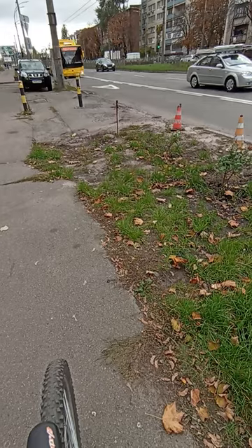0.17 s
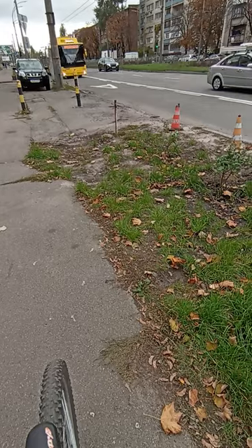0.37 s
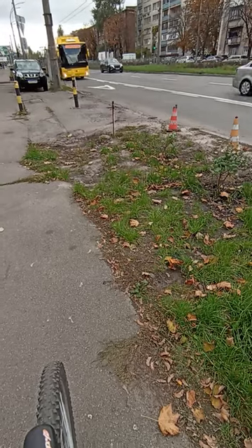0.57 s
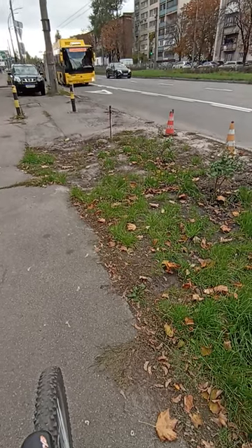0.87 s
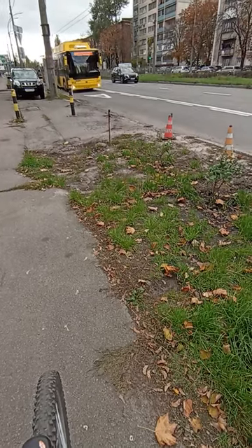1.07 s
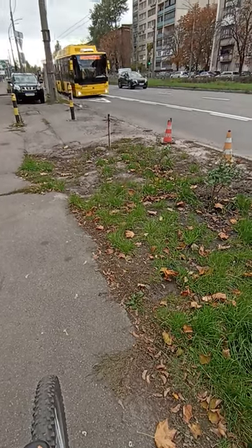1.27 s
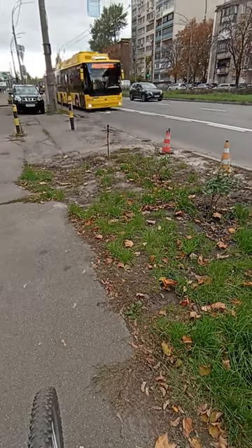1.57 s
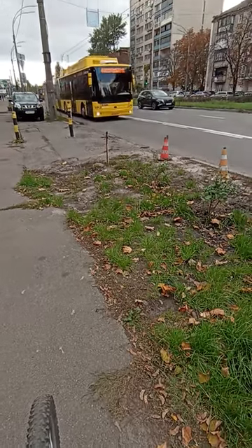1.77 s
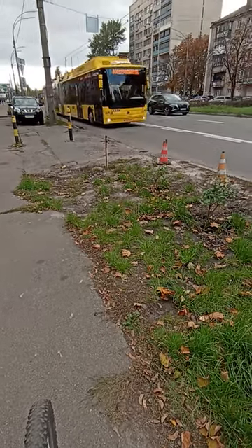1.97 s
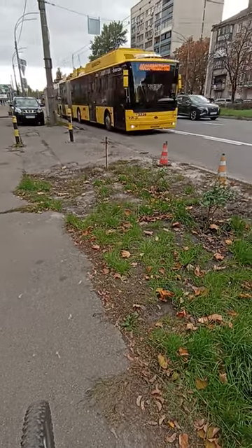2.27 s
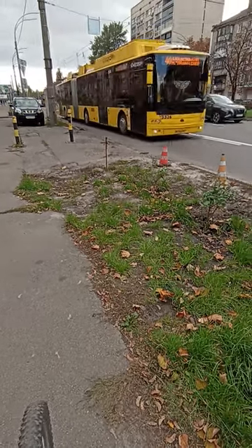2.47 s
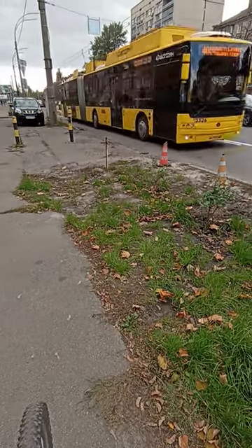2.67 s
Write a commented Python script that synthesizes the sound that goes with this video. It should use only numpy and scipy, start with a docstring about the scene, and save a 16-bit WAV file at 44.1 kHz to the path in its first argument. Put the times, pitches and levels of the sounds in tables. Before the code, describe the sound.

Outdoor roadside stereo pickup: car tyres hiss away first, then trolleybus tyres swell and stay loud, with bass rumble, short gliding electric whines, a few dull body knocks and faint dry ticks.

```python
"""Tyres roar on a city street: a car recedes as its level falls, then a trolleybus nears as its level rises.
The roar is coloured noise with random flutter, over a low noise rumble and a wavering traffic hum.
Gliding tones whine in short swells; noise bursts through resonances make body rattles and faint dry ticks.
Very high chirps are brief swells of tone. The whole street fades in and spreads over two microphone ports."""
import sys
import numpy as np
from scipy import signal
from scipy.fft import rfft, irfft, next_fast_len
from scipy.io import wavfile
from scipy.ndimage import uniform_filter1d, map_coordinates

SR = 44100
rng = np.random.default_rng(int(sys.argv[2]) if len(sys.argv) > 2 else 0)


def file_out(sig):
    """Save sig as 16-bit WAV at sys.argv[1]."""
    # one column per channel
    cols = np.atleast_2d(sig).T
    # limit, then scale
    lim = np.clip(cols, -1, 1)
    pcm = np.round(lim * 32767).astype(np.int16)
    wavfile.write(sys.argv[1], SR, pcm)


N = 123921

# Tyre roar over time, before the treble swells. Each row: time in seconds, level in dB.
CAR_LEVEL = [(.3, -32), (.8, -31), (1.1, -33), (1.5, -40), (2, -39.5), (2.8, -43)]
BUS_LEVEL = [(.3, -48), (1, -35.5), (1.4, -30.5), (1.8, -28), (2, -28.5), (2.3, -27.5), (2.55, -28),
             (2.8, -27)]
# Relative spectrum of the tyre roar. Each row: frequency in Hz, density in dB per Hz.
CAR_COLOUR = [(200, -24), (420, -3.5), (600, -4), (830, 1), (1000, -2.5), (1130, -7.5), (1450, -6.5),
              (2000, -12.5), (2700, -16), (3500, -23), (3850, -29.5), (4600, -32), (5300, -37.5),
              (6700, -34), (7200, -41.5), (8600, -46.5), (9500, -42), (11400, -41), (11900, -34),
              (13500, -41), (15500, -46)]
BUS_COLOUR = [(200, -22), (420, -2.5), (600, -2.5), (850, 1), (1000, -2.5), (1200, -6), (1700, -9),
              (2100, -13.5), (2900, -23), (3550, -25), (3850, -31.5), (4800, -35.5), (6700, -36.5),
              (7100, -50.5), (8700, -47), (9400, -46.5), (11400, -43), (11900, -39), (13500, -45.5),
              (15500, -52)]
# Treble of the tyre roar. Each row: time in seconds, change in dB well above the split.
TREBLE_LEVEL = [(.3, -0.5), (.7, 1.5), (.95, 1.2), (1.12, 1.5), (1.3, 0.5), (1.65, -1), (1.8, 1),
                (2.05, 1.2), (2.2, -1), (2.8, 2)]
TREBLE_SPLIT_HZ = 4500
# Low road rumble over time. Each row: time in seconds, level in dB before the trim.
RUMBLE_LEVEL = [(.1, -31.5), (.4, -30.5), (.6, -30.5), (.75, -29.5), (.92, -30.3), (1.04, -27.5),
                (1.15, -32), (1.3, -30), (1.6, -29.5), (1.84, -25.5), (2, -30), (2.15, -27), (2.45, -27.5),
                (2.8, -23.5)]
# Relative spectrum of the rumble. Each row: frequency in Hz, density in dB per Hz.
RUMBLE_COLOUR = [(20, -35), (40, -31), (52, -20), (65, -8.5), (100, -3.5), (150, -1.5), (230, 0), (330, -1),
                 (420, -2.5), (520, -14), (700, -28), (1500, -62)]
RUMBLE_TRIM_DB = -0.02
# Bass traffic hum. Each row: time in seconds, pitch in Hz, level in dB around which it wavers.
HUM = [(.2, 70.1, -51), (.45, 70.4, -44), (.6, 67.2, -41), (.95, 69.9, -38), (1.1, 70.4, -45.5),
       (1.3, 70.4, -37.5), (1.6, 73.25, -38.5), (1.8, 75.1, -31.5), (1.95, 75, -37.5), (2.1, 77.1, -43.5),
       (2.4, 75.34, -45), (2.8, 76.2, -47)]
# Overtones of the drone. Each row: multiple of the base pitch, level in dB before the swells.
DRONE_OVERTONES = [(2, -40), (3, -38.5)]
# Swells of the drone. Each row: time in seconds, change in level in dB.
DRONE_SWELL = [(.2, -5), (.7, 1.5), (1.2, -7), (1.7, -2), (2.2, -20)]
DRONE_BASE_HZ = 75
# High chirps. Each row: start in seconds, level in dB before the trim, pitch in Hz.
CHIRPS = [(0.1141, -49.5, 9700), (0.3092, -56, 9650), (0.4065, -56, 9500), (0.5931, -65, 9650),
          (0.718, -56, 9490), (0.8086, -57, 9650), (0.9193, -62, 9460), (1.0131, -56, 9460),
          (1.1169, -53, 9280), (1.2206, -64, 9430), (1.3251, -59, 9140), (1.4278, -59, 9330),
          (1.5354, -59, 9580), (1.6092, -61, 9320), (1.6347, -53.5, 9270), (1.8462, -54, 9160),
          (2.0667, -61, 9220), (2.1715, -60, 9350), (2.2827, -64, 8890), (2.393, -55, 9150)]
CHIRP_S, CHIRP_TRIM_DB, CHIRP_WANDER_HZ = 0.0045, -3.5, 330
# Swells of whine. Each row: centre in seconds, half length in seconds, pitch at the centre in Hz,
# glide in Hz per second, level in dB at the centre, pitch wander in Hz.
WHINES = [(1.664, 0.1, 200, -2.5, -37, 3.03), (2.16, 0.096, 200, -20.5, -32.5, 6),
          (2.12, 0.066, 300, -80, -30.5, 12), (2.29, 0.1, 300, -39.5, -31, 4),
          (2.3, 0.076, 303, -33, -32, 4), (2.62, 0.13, 245, -21.5, -35, 5.2),
          (2.55, 0.15, 143, 21.5, -35.5, 6), (2.25, 0.099, 960, -100, -38.5, 25),
          (2.44, 0.11, 850, -29.5, -35.5, 18), (2.75, 0.075, 872, 40.5, -36, 14),
          (1.6, .1, 3400, -200, -55.5, 130), (0.41, 0.13, 2500, -500, -47.5, 400),
          (2.02, 0.31, 1620, 0, -44, 330)]
# Small dry ticks. Each row: start in seconds, level in dB, centre of the resonance in Hz.
TICKS = [(.832, -51, 12100), (.875, -50.5, 6000), (.973, -53, 7500), (1.093, -48, 4180), (1.12, -53, 5500),
         (1.271, -51, 7800), (1.552, -53, 4600), (1.91, -57, 7890), (2.364, -51, 11400), (2.365, -49, 5200),
         (2.503, -53, 6000), (2.761, -45, 6190), (2.761, -51, 10000)]
TICK_T60_S, TICK_WIDTH = 0.028, 0.15  # decay of the push; resonance width as a share of its centre
# Body rattles. Each row: start in seconds, level in dB, centre of the resonance in Hz.
RATTLES = [(1.579, -32, 2370), (1.595, -30, 1493), (1.806, -21, 710), (1.817, -27, 1153),
           (1.818, -38.5, 3180), (1.818, -45, 5670), (2.06, -48, 4600), (2.714, -29, 684)]
RATTLE_T60_S, RATTLE_WIDTH = 0.035, 0.13  # as for the ticks
# Likeness of the roar and rumble in the two channels. Each row: frequency in Hz, likeness from 0 to 1.
ALIKE = [(250, .998), (420, .95), (620, 0.77), (950, 0.88), (1500, 0.6), (2400, 0.61), (4000, 0.38),
         (7000, .35), (10000, .1)]
# Colour of the microphone ports. Each row: frequency in Hz, left minus right in dB.
LEAN = [(60, 1.5), (92, -1.5), (140, -0.5), (210, -1), (330, -2.5), (500, -6.5), (770, -3.5), (1170, -3.5),
        (1790, 0), (2740, -4.5), (4190, 2), (6410, -2), (9810, 15), (15000, 11.5)]
# Phase between the ports. Each row: frequency in Hz, radians by which the right leads.
LEAD = [(330, 0), (500, 0.22), (750, 1.41), (950, 1.06), (1400, 2.5), (1850, 2.5), (2300, 4), (3400, 6),
        (4200, 10.5), (5200, 12.5), (7400, 18), (15000, 37)]
# Fade-in: silent until START_S, opens to START_SHARE over OPEN_S while that share rises to 1 over RISE_S.
START_S, OPEN_S, START_SHARE, RISE_S = 0.079, 0.023, 0.28, 0.21
TOP_HZ = 15750  # band limit


def amp(db):
    """Turn decibels into gain."""
    return 10 ** (np.asarray(db) / 20)


def unit(x):
    """Scale to rms 1."""
    return x / np.sqrt(np.mean(x ** 2) + 1e-20)


def along(points, hz):
    """Read (Hz, value) points along a log frequency axis."""
    f, value = np.transpose(points)
    return np.interp(np.log(hz + 1), np.log(f + 1), value)


def clock():
    """Seconds at each sample."""
    return np.arange(N) / SR


def curves(rows):
    """One value per sample for each column after the time."""
    s, *columns = np.transpose(rows)
    return [np.interp(clock(), s, column) for column in columns]


def wobble(rate):
    """A smooth random curve with rate knots a second."""
    knots = rng.standard_normal(4096)
    return map_coordinates(knots, [clock() * rate], mode="wrap")


def filtered(x, response):
    """Multiply the spectrum of x by a response of frequency, padded so that tails do not wrap."""
    size = next_fast_len(N + SR // 2)
    hz = np.fft.rfftfreq(size, 1 / SR)
    return irfft(rfft(x, size) * response(hz), size)[..., :N]


def rush(colour, patchy_db):
    """Coloured stereo noise of rms 1, with random gain patches in time and frequency shared by both sides."""
    spectra = signal.stft(rng.standard_normal((2, N)), nperseg=512)[2]
    patches = rng.standard_normal(spectra.shape[1:])
    patches = uniform_filter1d(patches, size=6, axis=0)  # across frequency
    patches = uniform_filter1d(patches, size=12, axis=1)  # across time
    patchy = spectra * amp(patchy_db * unit(patches))
    pair = signal.istft(patchy, nperseg=512)[1][:, :N]

    def response(hz):
        # The split between mid and side sets how alike left and right are.
        turn = np.arccos(np.clip(along(ALIKE, hz), -1, 1)) / 2
        return amp(along(colour, hz)) * np.array([np.cos(turn), np.sin(turn)])

    mid, side = filtered(pair, response)
    return unit(np.array([mid + side, mid - side]))


def tone(hz, wander_hz):
    """A sine of about rms 1 whose pitch wanders at random; a wider wander is also faster."""
    pitch = hz + wander_hz * wobble(2 * wander_hz) / 2
    phase = 2 * np.pi * np.cumsum(pitch) / SR
    return np.sqrt(2) * np.sin(phase)


def tyres(level, colour, patchy_db, flutter_db):
    """Tread roar: noise that flutters at three speeds with the grain of the asphalt."""
    flutter = 0.51 * wobble(14) + 0.49 * wobble(90) + 0.55 * wobble(450)
    gain = amp(curves(level)[0] + flutter_db * flutter)
    return gain * rush(colour, patchy_db)


def road():
    """Car and trolleybus tyres add up, then the treble of the sum swells and dips."""
    car = tyres(CAR_LEVEL, CAR_COLOUR, patchy_db=0.82, flutter_db=1)
    bus = tyres(BUS_LEVEL, BUS_COLOUR, patchy_db=1.23, flutter_db=0.91)
    roar = car + bus
    treble = filtered(roar, lambda hz: 1 - 1 / (1 + (hz / TREBLE_SPLIT_HZ) ** 4))
    return roar + treble * (amp(curves(TREBLE_LEVEL)[0]) - 1)


def rumble():
    """The low roll of heavy wheels: bass-heavy noise that surges unevenly and ends louder."""
    gain = amp(curves(RUMBLE_LEVEL)[0] + RUMBLE_TRIM_DB)
    return gain * rush(RUMBLE_COLOUR, patchy_db=0.0)


def hum():
    """A bass tone wavers in pitch and level under a drone of overtones at a steadier pitch."""
    hz, db = curves(HUM)
    bass = amp(db + 1.7 * wobble(9)) * tone(hz, wander_hz=2.16)
    drone = np.zeros(N)
    for multiple, level in DRONE_OVERTONES:
        drone += amp(level) * tone(multiple * DRONE_BASE_HZ, wander_hz=2.49)
    return bass + amp(curves(DRONE_SWELL)[0]) * drone


def chirps():
    """Each tiny chirp is a high wandering tone under a bell-shaped swell of a few milliseconds."""
    out = np.zeros(N)
    for s, db, hz in CHIRPS:
        swell = np.exp(-((clock() - s) / CHIRP_S - .7) ** 2)
        out += amp(db + CHIRP_TRIM_DB) * swell * tone(hz, CHIRP_WANDER_HZ)
    return out


def whine():
    """Tones of drives and treads, some narrow, some hissy, swell, glide and fade."""
    out = np.zeros(N)
    for s, half, hz, glide, db, wander in WHINES:
        age = clock() - s
        swell = np.exp(-(age / half) ** 2)
        out += amp(db) * swell * tone(hz + glide * age, wander)
    return out


def contacts(rows, t60, width):
    """Each contact drives one resonance with a sharp crack and a short, decaying noise scrape."""
    out, size = np.zeros(N + SR), SR // 8
    age, f = np.arange(size) / SR, np.fft.rfftfreq(size, 1 / SR)
    for s, db, hz in rows:
        scrape = rng.standard_normal(size) * amp(-60 * age / t60)
        crack = 9 * (age == 0)
        damping = 1j * f * hz * width
        resonance = damping / (hz * hz - f * f + damping)
        ratio = f / (2 * hz)  # two low-pass stages an octave above the centre
        body = resonance / (1 + 1j * ratio) / (1 + 1j * ratio - ratio ** 2)
        body /= np.sqrt(np.mean(np.abs(body) ** 2))
        out[round(s * SR):][:size] += amp(db) * irfft(rfft(scrape + crack) * body, size)
    return out[:N]


def ticks():
    """Faint dry ticks: short contacts, mostly in high resonances."""
    return contacts(TICKS, TICK_T60_S, TICK_WIDTH)


def rattles():
    """Body rattles: slightly longer contacts, mostly in lower resonances."""
    return contacts(RATTLES, RATTLE_T60_S, RATTLE_WIDTH)


def ports(x):
    """Sound reaches the right microphone port first in phase; each port has its own colour."""
    def response(hz):
        sides = np.array([[1], [-1]])  # left, right
        gain = amp(sides * along(LEAN, hz) / 2)
        gain = gain / np.sqrt(np.mean(gain ** 2, axis=0))  # keeps the mean power of the two sides
        return gain * np.exp(-1j * sides * along(LEAD, hz) / 2)
    return filtered(x, response)


def scene():
    """Everything on the street adds up and passes through the two ports."""
    street = road() + rumble() + hum() + chirps() + whine() + ticks() + rattles()
    return ports(street)


def record(dry):
    """A quick fade-in in two overlapping ramps, then the band limit."""
    age = clock() - START_S
    opening = np.clip(age / OPEN_S, 0, 1)
    rise = np.clip(START_SHARE + (1 - START_SHARE) * age / RISE_S, 0, 1)
    return filtered(dry * opening * rise, lambda hz: hz < TOP_HZ)


dry = scene()
out = record(dry)
file_out(out)
```